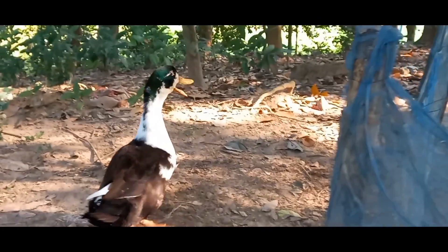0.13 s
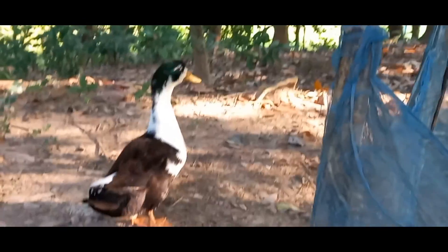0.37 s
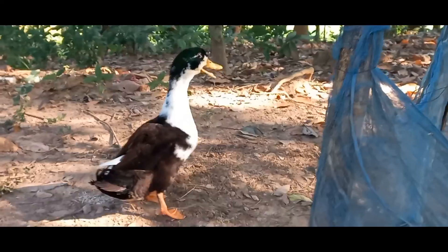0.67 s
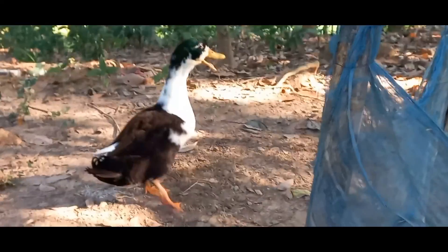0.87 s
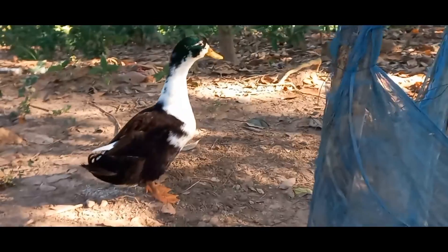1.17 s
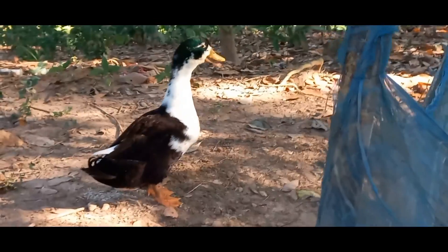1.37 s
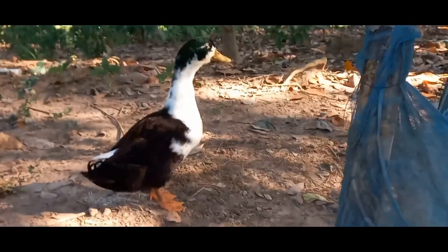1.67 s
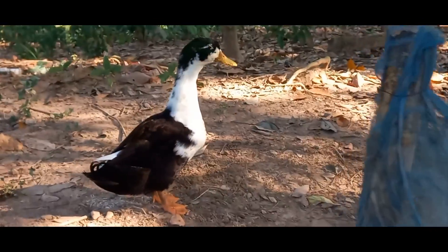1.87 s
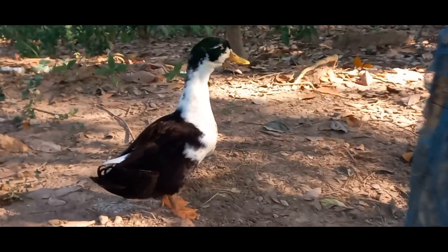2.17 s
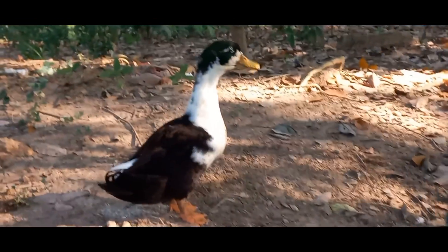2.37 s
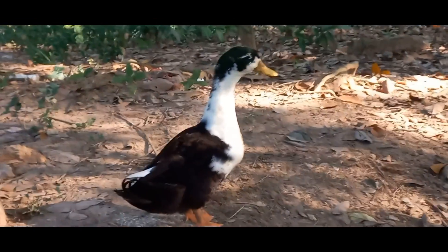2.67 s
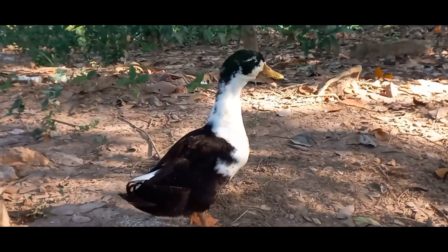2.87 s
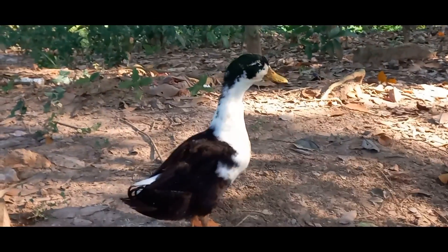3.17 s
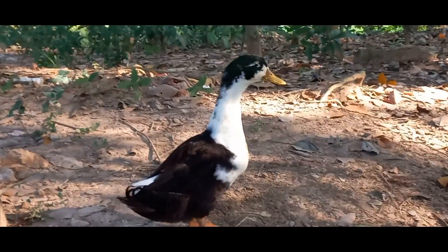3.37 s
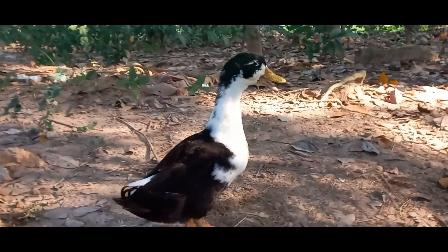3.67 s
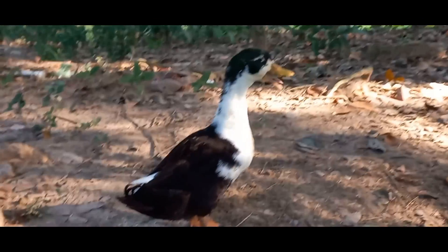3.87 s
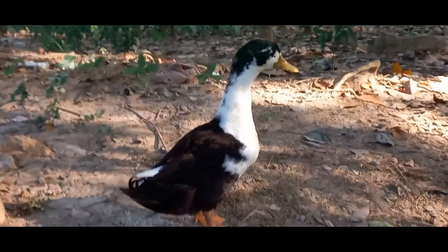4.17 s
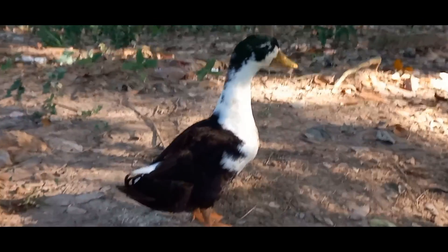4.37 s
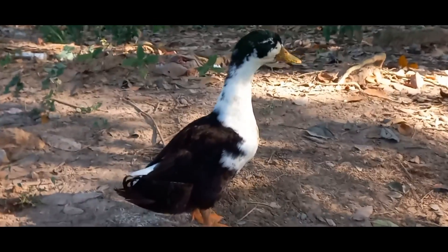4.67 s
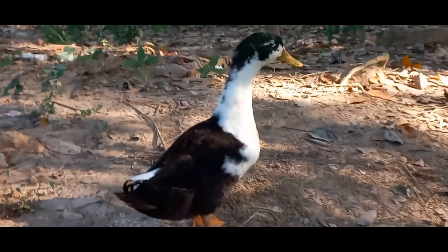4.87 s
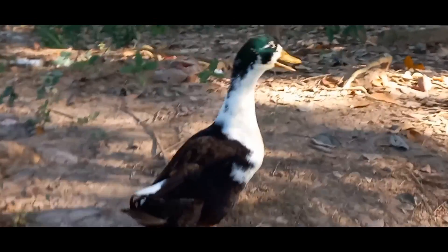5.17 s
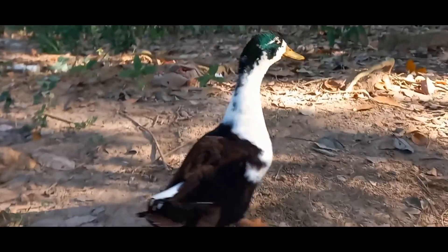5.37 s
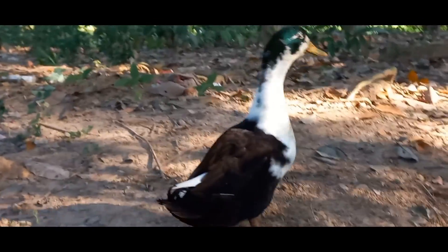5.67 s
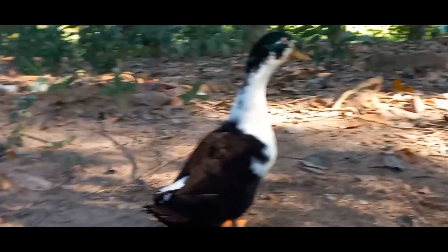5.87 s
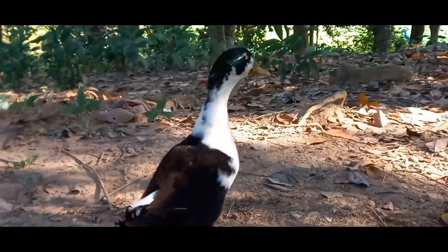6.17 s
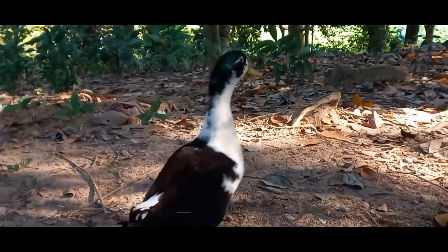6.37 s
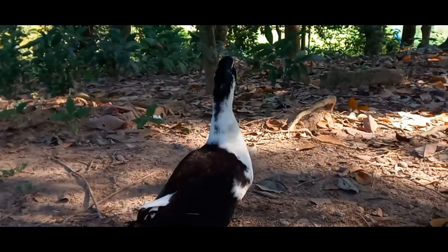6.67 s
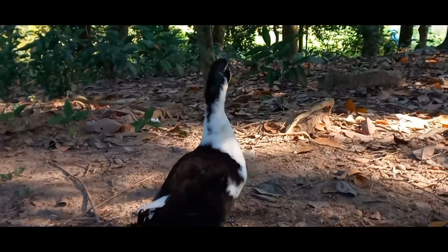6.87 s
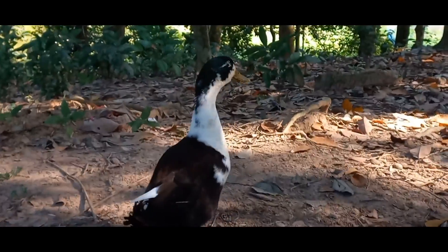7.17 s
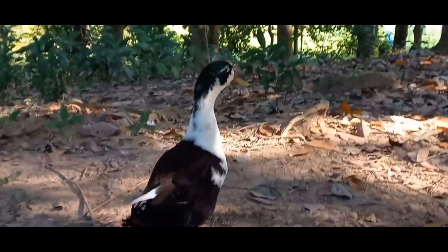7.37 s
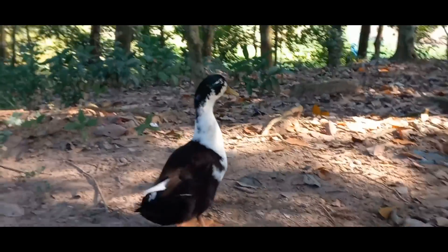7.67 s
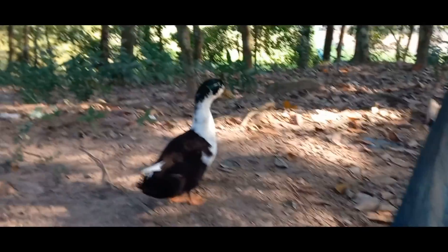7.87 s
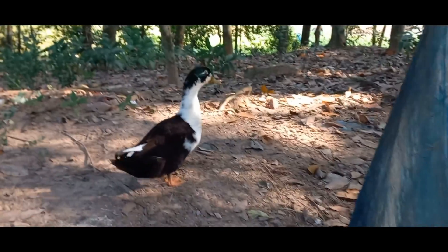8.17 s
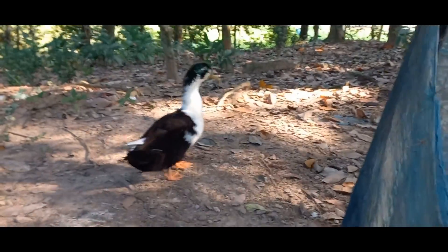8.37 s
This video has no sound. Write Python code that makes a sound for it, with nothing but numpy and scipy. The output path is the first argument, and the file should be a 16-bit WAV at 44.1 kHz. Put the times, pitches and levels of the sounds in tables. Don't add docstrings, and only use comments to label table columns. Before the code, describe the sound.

A drake gives seven loud, swelling raspy quacks, then shorter, fading ones, while hens cluck softly and insects fizz in a leafy yard.

```python
import sys
import numpy as np
from scipy import signal
from scipy.fft import rfft, irfft
from scipy.io import wavfile
from scipy.ndimage import uniform_filter1d

SR = 44100
rng = np.random.default_rng(int(sys.argv[2]) if len(sys.argv) > 2 else 0)


def boost_factor(decibels):
    exponent = np.asarray(decibels, float) / 20
    return 10 ** exponent


def unload_wav(signal):
    wavfile.write(
        sys.argv[1],
        SR,
        np.round(np.clip(np.atleast_2d(signal).T, -1, 1) * 32767).astype(np.int16),
    )


N = 376168
EASY_THROAT_HZ = 1580


def evened(x):
    return x / np.sqrt(np.mean(x ** 2) + 1e-20)


def read(points, hz):
    f, value = np.transpose(points)
    return np.interp(np.log(hz + 1), np.log(f + 1), value)


def unroll(rows):
    s, *columns = np.transpose(rows)
    t = np.arange(s[0], s[-1], 1 / SR)
    return [np.interp(t, s, column) for column in columns]


def add(mix, s, sound):
    part = mix[..., round(s * SR):][..., :sound.shape[-1]]
    part += sound[..., :part.shape[-1]]


def above(x, hz):
    return signal.sosfilt(signal.butter(4, hz, "high", fs=SR, output="sos"), x)


def ring(x, hz, width):
    turn = np.exp(2j * np.pi * np.cumsum(hz * np.ones(x.shape[-1])) / SR)
    r = np.exp(-np.pi * width / SR)
    smooth = signal.lfilter([(1 - r) ** 2], [1, -2 * r, r * r], x / turn + 1e-18)
    return 2 * (turn * smooth).real


def band(x, hz, width):
    return evened(ring(ring(x, hz, width), hz, width))


def drift(length, size):
    noise = rng.standard_normal(length)
    return evened(uniform_filter1d(uniform_filter1d(noise, size), size))


def hiss(points, patchy_db):
    # (frequency [Hz], likeness [0-1])
    likeness = [(30, 0.69), (150, 0.43), (600, 0.59), (2000, 0.14), (15000, .05)]
    frames, hz = N // 256 + 5, np.fft.rfftfreq(1024, 1 / SR)
    a, b, c, d, patches = rng.standard_normal((frames, 513, 5)).T
    patches = uniform_filter1d(patches, size=12, axis=0)
    patches = evened(uniform_filter1d(patches, size=14, axis=1))
    same = np.clip(read(likeness, hz), -1, 1)[:, None]
    left = a + 1j * b
    right = same * left + np.sqrt(1 - same ** 2) * (c + 1j * d)
    colour = boost_factor(read(points, hz)[:, None] + patchy_db * patches)
    noise = signal.istft(np.array([left, right]) * colour, nperseg=1024, noverlap=768)[1]
    return evened(noise[:, :N])


def trees(x):
    # (frequency [Hz], time to fall 60 dB [s])
    echo_times = [(200, 0.5), (1500, 0.27), (3000, 0.43), (8000, 0.032)]
    taps = np.zeros((2, SR // 2))
    at = np.arange(120, SR // 2 - 20, 20) + rng.integers(0, 20, (2, (SR // 2 - 121) // 20))
    np.put_along_axis(taps, at, rng.choice([-1., 1.], at.shape), 1)
    hz, t, z = signal.stft(taps, SR, nperseg=256)
    decay = boost_factor(-60 * t / read(echo_times, hz)[:, None])
    tail = signal.istft(z * decay, SR, nperseg=256)[1]
    return signal.fftconvolve(x[None], tail / np.linalg.norm(tail[0]), axes=1)[:, :N]


def placed(x, left_db, wet_db, late):
    direct = np.array([boost_factor(left_db) * np.roll(x, late), x])
    return direct + boost_factor(wet_db) * trees(x)


def still_air():
    # (frequency [Hz], level per Hz [dB])
    air_colour = [(30, -35), (45, -31), (70, -5.5), (110, 1), (170, -10.5), (400, -15.5), (900, -20.5),
                  (1500, -21.5), (2400, -20.5), (3300, -25), (3850, -16.5), (5000, -11.5), (6800, -21),
                  (15500, -46.5)]
    return boost_factor(-69) * hiss(air_colour, patchy_db=1.0)


def insects():
    # (start [s], end [s], level [dB])
    cricket_phrases = [(0, 0.1, -90), (0.374, 0.68, -74.5), (1.1, 1.315, -77), (1.86, 2.248, -76.5),
                       (2.59, 2.858, -77.5), (3.45, 3.75, -75), (4.102, 4.25, -78.5), (4.9, 5.224, -75),
                       (5.372, 5.932, -76.5), (6.676, 7.176, -73), (7.233, 7.386, -71),
                       (8.437, 8.527, -82.5)]
    # (frequency [Hz], width [Hz], level [dB])
    cicada_bands = [(4587, 880, -74.5), (5937, 630, -73.5), (7920, 1520, -76), (9290, 1340, -77)]
    noise, t, phrases = rng.standard_normal((2, N)), np.arange(N) / SR, np.zeros(N)
    for s, end, db in cricket_phrases:
        add(phrases, s, boost_factor(db) * signal.windows.tukey(round((end - s) * SR), .3))
    strokes = 1 + 0.5 * np.sin(2 * np.pi * 68 * t + 1.3 * drift(N, size=2000))
    throb = strokes * boost_factor(3.2 * drift(N, size=900))
    wings = evened(ring(ring(noise, 2120, 330), 2320, 200))
    wings = wings + boost_factor(2.2) * band(noise, 4405, 500)
    fizz = sum(boost_factor(db + 0.68 * drift(N, size=4000)) * band(noise, hz, width)
               for hz, width, db in cicada_bands)
    return phrases * throb * wings + fizz


def breath_and_snaps():
    # (time [s], half length [s], level [dB])
    swells = [(0.306, 0.22, -69.5), (0.98, 0.17, -73.5), (1.648, .2, -83), (2.845, 0.042, -83.5),
              (3.254, .1, -80), (3.971, 0.2, -81), (4.462, .11, -72), (4.793, 0.32, -77),
              (5.236, .06, -77.5), (5.474, .3, -82.5), (6.29, .08, -81), (7.655, .07, -75)]
    # (frequency [Hz], level per Hz [dB])
    breath_colour = [(1500, -26), (4000, -7), (7000, -10), (10000, -10), (13000, -12), (16000, -22.5)]
    # (time [s], length [s], level [dB], centre [Hz], left over
    # right [dB])
    snaps = [(.435, .004, -68, 1500, 0), (3.445, .004, -68, 1200, 0), (6.295, .006, -66, 800, 0),
             (6.275, .03, -77, 2000, 0), (1.956, 0.0026, -57, 2500, -1.5), (2.831, 0.029, -71, 12400, -1),
             (3.351, 0.005, -54, 1800, 19.5), (4.349, 0.004, -72.5, 2200, 29.5),
             (5.184, 0.025, -54, 4000, -5.5), (5.232, 0.028, -59.5, 3650, -7.5),
             (5.252, 0.0026, -57, 6000, 10), (5.701, 0.0065, -71, 830, 0), (3.772, 0.0065, -66, 6200, 0),
             (1.245, 0.019, -66.5, 570, -2), (6.928, 0.0062, -70, 800, 0), (7.744, .015, -72, 660, 0),
             (8.347, 0.024, -73.5, 860, -1), (4.479, 0.012, -72.5, 520, 3), (4.39, .06, -72, 12500, -8),
             (7.09, .02, -76, 12000, -8), (6.52, .008, -76, 11000, -8), (6.231, 0.017, -72, 9400, -8),
             (6.238, 0.0037, -66, 8800, -8), (7.368, 0.0037, -70, 820, 11), (7.605, 0.0027, -64, 5100, 7),
             (7.62, 0.023, -63.5, 14400, -8)]
    t = np.arange(N) / SR
    steps = sum(boost_factor(db) * np.exp(-2 * ((t - s) / half) ** 2) for s, half, db in swells)
    stir = boost_factor(-82) + steps * boost_factor(2.0 * drift(N, size=250))
    out = stir * boost_factor(6.5) * hiss(breath_colour, patchy_db=1.2)
    for s, length, db, hz, left_db in snaps:
        u = np.linspace(0, 1, round(1.87 * length * SR))
        crackle = rng.standard_normal(len(u)) * np.exp(-2.5 * u ** 2)
        level = boost_factor([[db + left_db / 2], [db - left_db / 2]])
        add(out, s, level * evened(ring(crackle, hz, 1.1 * hz)))
    return out


def bird():
    # (time [s], length [s], level [dB], first pitch [Hz], last pitch [Hz])
    bird_notes = [(6.28, .09, -59, 4130, 4290), (6.325, .22, -61, 4240, 4270), (6.59, .25, -64, 4060, 3960),
                  (6.45, 0.2, -67, 3850, 3600), (6.725, .09, -55, 4100, 4900),
                  (6.79, 0.22, -65, 4800, 4700), (6.76, .3, -62, 4350, 4450), (7.0, .25, -69, 4480, 4450),
                  (7.19, .06, -68, 3950, 3950), (7.26, .12, -66, 4400, 4350), (7.19, .06, -70, 5350, 5300),
                  (8.42, .11, -70, 4330, 4330)]
    blurs = [90, 110, 150, 700, 90, 350, 900, 700, 300, 800, 250, 120]
    out = np.zeros(N)
    for (s, length, db, first_hz, last_hz), blur_hz in zip(bird_notes, blurs):
        fade_db, hz = unroll([(0, db, first_hz), (length, db - 14, last_hz)])
        trill = 1 + .5 * np.sin(2 * np.pi * 55 * np.arange(len(hz)) / SR)
        pure_share = 1.3 * (blur_hz < 200)
        line = pure_share * np.sin(2 * np.pi * np.cumsum(hz) / SR)
        smeared = band(rng.standard_normal(len(hz)), hz, blur_hz)
        note = trill * signal.windows.tukey(len(hz), .3) * evened(line + smeared)
        add(out, s, boost_factor(fade_db) * note)
    return placed(out, -1.0, 0.93, late=2)


def whistle(length, db, first_hz, last_hz):
    hz = np.linspace(first_hz, last_hz, round((length + 0.0073) * SR))
    turn = 2 * np.pi * np.cumsum(hz) / SR
    tone = np.sin(turn) + boost_factor(-11.5) * np.sin(2 * turn)
    tone = tone * (1 + .25 * drift(len(hz), size=80))
    return boost_factor(db + 8.0 + np.linspace(0, -8, len(hz))) * tone * signal.windows.tukey(len(hz), .7)


def cluck(length, effort_db, hz, sag, chest_db, throat_hz, width, bill_db, breath):
    # (frequency [Hz], width [Hz], level [dB])
    bill_rings = [(1427, 1240, 12.5), (2170, 390, -3.5), (5670, 2500, -8)]
    u = np.linspace(-.5, .5, round((length + .012) * SR))
    turns = np.cumsum(hz * (1 - sag * u) * (1 + .02 * drift(len(u), size=100))) / SR
    folds = evened(sum(np.cos(2 * np.pi * k * turns + k * k / 3) for k in range(2, 30)))
    air = rng.standard_normal(len(u))
    drive = folds * (1 + .12 * drift(len(u), size=60)) + breath * air
    throat = evened(ring(above(drive, 2.154 * hz), throat_hz * (1 - 0.27 * sag * u), width))
    bill = sum(boost_factor(db) * band(drive, f, w) for f, w, db in bill_rings)
    chest = np.sqrt(2) * np.sin(2 * np.pi * turns)
    chest += 0.33 * (.6 - u) * np.sin(4 * np.pi * turns)
    chest += 0.44 * evened(ring(air, 220, 250))
    voice = throat + boost_factor(bill_db) * bill + (1 + 0.09 * u) * boost_factor(chest_db) * chest
    return boost_factor(effort_db + 8.0) * voice * signal.windows.tukey(len(u), .85)


def hens():
    # (time [s], length [s], effort [dB], pitch [Hz], throat [Hz])
    open_clucks = [(0.532, 0.07, -56, 233, 1320), (1.388, 0.044, -53.5, 209.5, 1210),
                   (1.577, 0.048, -47, 210.6, 1266), (1.79, 0.045, -45, 221.5, 1274)]
    shut_clucks = [(0, 0.018, -48, 210.8, 980), (0.24, 0.063, -47, 212.3, 824),
                   (0.664, 0.07, -53, 245, 890), (0.73, 0.048, -48, 223.2, 620),
                   (0.976, 0.057, -44, 238.3, 646), (1.28, 0.069, -47, 233.6, 666),
                   (1.063, 0.0478, -48, 250, 830), (1.647, 0.059, -46.5, 188.9, 900),
                   (1.902, 0.04, -47.5, 211, 813), (3.241, 0.04, -49, 209, 639),
                   (3.388, 0.0529, -47.5, 224, 600)]
    soft_clucks = [(0.885, 0.064, -55, 248.7, 874), (3.735, 0.046, -52, 211.5, 670),
                   (3.919, 0.033, -55, 235.2, 740), (7.056, 0.043, -48, 207.8, 607),
                   (7.284, 0.022, -56.5, 234.7, 610), (7.643, 0.016, -53, 272.4, 800)]
    deep_clucks = [(4.98, 0.056, -53, 223.8, 890), (6.731, 0.023, -72, 222.6, 561),
                   (7.454, 0.0263, -58, 225.3, 650), (8.172, 0.023, -75.5, 224.6, 533)]
    hoarse_cluck = [(8.37, .075, -52.5, 178.7, 880)]
    # (throat width [Hz], bill level [dB], breath [share])
    manners = [
        (560, -8, 1.0),
        (450, -14, .8),
        (240, -16, .95),
        (380, -14, 1.5),
        (600, -12, 2.5),
    ]
    chest_levels = [-5, -8.5, -19, -3, -14.5]
    pitch_sags = [
        [-.25, .14, .1, .12],
        [.3, .3, .2, .36, .36, .28, .3, .08, .18, .36, .3],
        [.2, .3, .3, .3, .3, .3],
        [.3, .3, .3, .3],
        [.2],
    ]
    # (time [s], length [s], level [dB], first pitch [Hz], last pitch [Hz])
    lead_ins = [(0.632, 0.029, -50, 1113, 740), (0.869, 0.019, -47, 1090, 640),
                (1.063, 0.013, -47, 1200, 950), (1.277, 0.018, -50.5, 982, 795),
                (1.377, 0.022, -53, 790, 775), (1.572, 0.01, -40.5, 1110, 1100),
                (1.638, 0.019, -47.5, 830, 820), (1.777, 0.032, -50, 910, 845),
                (1.901, 0.0071, -39.5, 820, 790), (3.215, 0.035, -46, 1040, 924),
                (3.706, 0.045, -56.5, 1083, 820), (3.894, 0.024, -54, 950, 930),
                (4.951, 0.055, -50, 860, 720), (7.027, 0.044, -48, 853, 797),
                (7.254, 0.039, -54.5, 932, 730), (7.438, 0.029, -52.5, 992, 778),
                (7.608, 0.04, -51.5, 1035, 786)]
    # (time [s], length [s], level [dB], first pitch [Hz], last pitch [Hz])
    lone_peeps = [(0.179, 0.024, -59, 770, 740), (0.375, 0.04, -49.5, 947, 600),
                  (0.84, 0.016, -48.5, 1096, 860), (.646, .03, -61, 1720, 1460),
                  (.658, 0.026, -45.5, 734, 890), (.775, 0.027, -50, 1256, 1320),
                  (.9, .06, -49, 1340, 1290), (7.22, .008, -66, 519, 500), (7.005, 0.01, -62, 600, 570),
                  (7.82, 0.045, -75, 1050, 1020), (1.868, 0.011, -55, 1200, 1190),
                  (2.602, 0.071, -54.5, 662, 762), (2.635, 0.035, -53, 794, 1277),
                  (2.665, 0.023, -57.5, 1257, 740), (3.045, 0.012, -62.5, 846, 695),
                  (3.547, 0.045, -56, 1047, 734), (3.562, .012, -66, 1820, 1750),
                  (3.6, .05, -68, 900, 1050), (4.635, 0.061, -57, 640, 670), (4.68, 0.021, -52.5, 640, 850),
                  (4.735, 0.033, -49, 905, 780), (4.787, 0.019, -50.5, 990, 675),
                  (7.81, 0.056, -67, 573, 650), (7.865, 0.017, -67, 600, 560)]
    # (time [s], length [s], level [dB], centre [Hz], width [Hz])
    bill_hisses = [(1.283, .06, -55.5, 5800, 900), (1.283, .05, -60, 7000, 900),
                   (1.283, .06, -57, 2300, 900), (3.388, .045, -60, 6200, 1200),
                   (3.388, .05, -62, 2200, 500), (3.388, .05, -61, 1600, 400), (.73, .04, -62, 2300, 700),
                   (.73, .04, -62, 6500, 2000), (3.55, .09, -70, 1400, 900)]
    out = np.zeros(N)
    groups = open_clucks, shut_clucks, soft_clucks, deep_clucks, hoarse_cluck
    for rows, sags, chest_db, manner in zip(groups, pitch_sags, chest_levels, manners):
        for (s, length, db, hz, throat_hz), sag in zip(rows, sags):
            sound = cluck(length, db, hz, sag, chest_db, throat_hz, *manner)
            add(out, max(s - .005, 0), sound)
    for s, *row in lead_ins + lone_peeps:
        add(out, s - .005, whistle(*row))
    for s, length, db, hz, width in bill_hisses:
        air = rng.standard_normal(round(length * SR))
        add(out, s, boost_factor(db) * band(air, hz, width) * signal.windows.tukey(len(air), .5))
    return placed(above(out, 60), -1.3, -27, late=12)


def long_rasp(s, climax, db, swell_db, hz, second_db, third_db, low_db, share):
    # (throat factor [ratio], second ring [dB], third ring [dB], low ring [dB])
    stages = [
        (.985, -15.5, -29.5, -13),
        (1.01, -17, -27, -18.5),
        (.995, -8, -15.5, -15),
        (1.002, -11.5, -12, -20),
        (.95, -8.5, -11.5, -3),
    ]
    early_shares = [1.4, 1.1, .6, .1, .1]
    onset_s, release_s = 0.041, .075
    times = s + np.array([0, onset_s, (onset_s + climax) / 2, climax, climax + release_s])
    effort_db = db + np.array([-21 - swell_db, -swell_db, (share - 1) * swell_db, 0, -26.5])
    bright_db = 0.0742 * (hz - EASY_THROAT_HZ)
    return [(t, e, hz * factor, second + early * bright_db + second_db, third + bright_db + third_db,
             low + low_db)
            for t, e, early, (factor, second, third, low) in zip(times, effort_db, early_shares, stages)]


def short_rasp(s, length, db, second_db, low_db, first_hz, last_hz):
    rise_s, fall_s = .02, 0.03
    times = s + np.array([0, rise_s, length - fall_s, length])
    effort_db = db + np.array([-17, 0, 1, -16])
    late_db = -np.array([2.2, 1, 0.26, 0])
    throat_hz = np.linspace(first_hz, last_hz, len(times))
    return [(t, e, hz, second_db + late, -24, low_db + late)
            for t, e, hz, late in zip(times, effort_db, throat_hz, late_db)]


def rasp(rows, clock, second_hz, uneven_db, climb):
    # (frequency [Hz], width [Hz], level [dB])
    side_rings = [(3040, 880, -18.5), (3934, 260, -22), (5410, 1200, -17.5), (5870, 310, -36.5)]
    # (time [s], level [dB])
    accents = [(.093, 3), (.106, 4), (.157, -7), (.198, -4), (.234, 4), (.326, 5), (.844, 5), (.939, -5),
               (1.067, -4), (1.099, 4), (1.597, 4), (1.658, -4), (1.733, 4), (1.754, 5), (2.268, 4),
               (2.295, 3), (2.332, 4), (2.356, 4), (2.392, -5), (2.435, -5), (2.508, 5), (3.025, 4),
               (3.039, 4), (3.171, -4), (3.184, -6), (3.193, 4), (3.227, 6), (3.247, 5), (3.268, -6),
               (3.794, 4), (3.834, 5), (3.975, 3), (4.078, 5), (4.551, 3), (4.565, -5), (4.663, 4),
               (4.708, -4), (4.741, 3), (4.751, 3), (4.783, 3), (5.373, 4), (5.988, 3), (6.332, 4),
               (6.345, -4), (6.358, 4), (6.6, 3)]
    effort_db, throat_hz, second_db, third_db, low_db = unroll(rows)
    t = rows[0][0] + np.arange(len(low_db)) / SR
    turns = np.polyval(clock, t) + .06 * drift(len(t), size=500)
    air = rng.standard_normal(len(t))
    stretch = 1 - climb * np.exp(-(turns + 2) / 6)
    second_hz = second_hz * stretch + 25 * drift(len(t), size=1500)

    def beats(hz, sharp, breath, late, width=520):
        beat = (turns - late + 5.5).astype(int)
        force, detune, phase = rng.standard_normal((99, 3))[beat].T
        swell = np.exp(sharp * (np.cos(2 * np.pi * (turns - late)) - 1))
        tone = np.cos(2 * np.pi * np.cumsum(hz + 32 * detune) / SR + 2 * phase)
        tone = swell * boost_factor(uneven_db * force) * tone
        rush = evened(band(air, hz, width) * (.5 + swell))
        return evened(evened(tone) + breath * rush)

    accent_s = .006
    accent_db = sum(.75 * db * np.exp(-((t - s) / accent_s) ** 2) for s, db in accents)
    rising_hz = throat_hz + 90 * np.sin(2 * np.pi * turns)
    low_hz = 1090 + 2.4 * (np.median(throat_hz) - EASY_THROAT_HZ)
    throat_breath = .2 + .25 * np.clip(turns / 12, 0, 1)
    voice = boost_factor(accent_db - .7) * beats(rising_hz, 1.3, throat_breath, 0, width=400)
    voice += boost_factor(second_db) * beats(second_hz, 1.2, .8, .35)
    voice += boost_factor(third_db) * beats(2630, 0.74, 1.0, 0.14, width=330)
    voice += boost_factor(low_db) * beats(low_hz, 1.7, 3, 0.19, width=510)
    puffs = air * (0.56 + np.exp(0.74 * np.cos(2 * np.pi * turns) - 1.5))
    for hz, width, db in side_rings:
        voice += boost_factor(db + third_db + 11.0) * evened(ring(puffs, hz, width))
    return boost_factor(effort_db) * voice * signal.windows.tukey(len(t), .1)


def drake():
    # (time [s], time to climax [s], climax [dB], swell [dB], throat [Hz])
    long_calls = [
        (.012, 0.33, -38.5, 12.5, 1653),
        (.78, 0.29, -36, 9.5, 1629),
        (1.49, .31, -35, 11, 1590),
        (2.21, 0.31, -34.5, 12, 1592),
        (2.97, 0.3, -33.5, 13, 1569),
        (3.745, 0.31, -35.5, 7, 1565),
        (4.5, 0.28, -33, 11, 1543),
    ]
    # (first clear beat [s], ten beats on [s], twenty beats on [s])
    long_tempos = [(.054, 0.177, .286), (0.805, .929, 1.039), (1.518, 1.644, 1.754), (2.241, 2.366, 2.479),
                   (2.998, 3.126, 3.236), (3.763, 3.894, 4.007), (4.524, 4.65, 4.762)]
    # (second ring [dB], third ring [dB], low ring [dB])
    head_turns = [(1, -2, 8.5), (-2, 0.5, 8.5), (0, 1, 2.5), (-1, 0.5, -0.5), (0.5, 0, -0.5), (3, 1, 0.5),
                  (0.5, -0.5, -2.5)]
    middle_shares = [0.45, 0.29, 0.4, 0.44, .4, 0.28, 0.41]
    # (time [s], length [s], level [dB], second ring [dB], low ring [dB])
    short_calls = [
        (5.266, 0.15, -47, -12, -16),
        (5.713, 0.084, -54.5, 1.5, -8.5),
        (5.951, 0.083, -49, -0.5, -10.5),
        (6.305, 0.084, -53, -2.5, -5.5),
        (6.556, 0.079, -54.5, 5, -7),
        (6.944, 0.08, -58.5, -4.5, 1),
        (7.175, 0.085, -55.5, 1.5, 0),
        (7.641, 0.067, -57.5, 5, 7.5),
        (7.886, 0.073, -59.5, 7.5, 4.5),
    ]
    # (first [Hz], last [Hz])
    throat_slides = [(1580, 1550), (1680, 1500), (1660, 1600), (1620, 1500), (1600, 1560), (1570, 1600),
                     (1560, 1560), (1600, 1560), (1570, 1570)]
    # (first clear beat [s], three beats on [s], second ring [Hz])
    short_tempos = [(5.281, 5.319, 2050), (5.725, 5.76, 1960), (5.963, 5.994, 1980), (6.32, 6.354, 2030),
                    (6.572, 6.605, 2050), (6.957, 6.99, 2060), (7.19, 7.224, 2080), (7.657, 7.694, 2090),
                    (7.898, 7.937, 2090)]
    out = np.zeros(N)
    for row, tempo, turned, share in zip(long_calls, long_tempos, head_turns, middle_shares):
        clock = np.polyfit(tempo, [0, 10, 20], 2)
        controls = long_rasp(*row, *turned, share)
        add(out, row[0], rasp(controls, clock, second_hz=2100.8, uneven_db=1.6, climb=.11))
    for row, slide, (first, later, second_hz) in zip(short_calls, throat_slides, short_tempos):
        clock = np.polyfit([first, later], [0, 3], 1)
        controls = short_rasp(*row, *slide)
        add(out, row[0], rasp(controls, clock, second_hz, uneven_db=2.2, climb=.05))
    treble = signal.oaconvolve(out, signal.firwin(255, 3200, pass_zero=False, fs=SR), "same")
    body = above(above(out - treble, 820), 820)
    return placed(body, 0, -15.5, late=3) + placed(treble, -.5, -5, late=2)


def scene():
    return still_air() + insects() + breath_and_snaps() + bird() + hens() + drake()


def mute_faint(x):
    hz, t, z = signal.stft(x, SR, nperseg=1024)
    power = uniform_filter1d((abs(z) ** 2).mean(0), size=3, axis=0)
    power = uniform_filter1d(power, size=2, axis=1)
    middle = (hz > 2350) & (hz < 7300)
    faint = middle[:, None] & (power < np.percentile(power[middle], 8.5))
    return signal.istft(z * np.where(faint, boost_factor(-22), 1), SR, nperseg=1024)[1][:, :N]


def roll_off(x):
    return signal.sosfilt(signal.butter(12, 15300, fs=SR, output="sos"), x)


def record(dry):
    # (frequency [Hz], left over right [dB])
    port_shade = [(200, 2), (3000, -1), (5500, -1), (8000, -8.5), (14000, -10.5)]
    tilt_db = read(port_shade, np.fft.rfftfreq(N, 1 / SR)) / 2
    ports = irfft(rfft(dry) * boost_factor([tilt_db, -tilt_db]), N)
    return roll_off(mute_faint(above(ports, 61)))


dry = scene()
out = record(dry)
unload_wav(out)
```